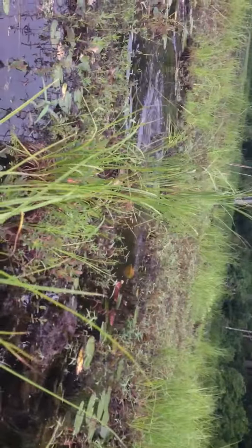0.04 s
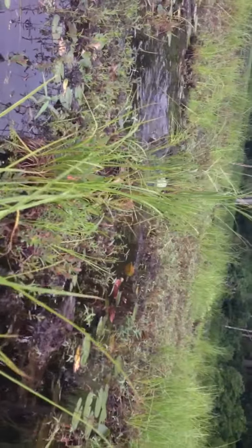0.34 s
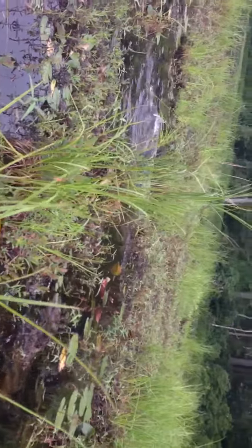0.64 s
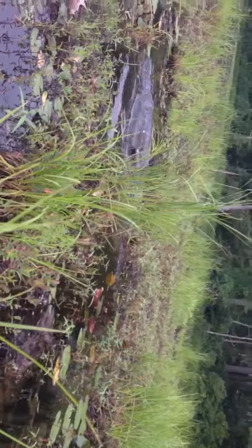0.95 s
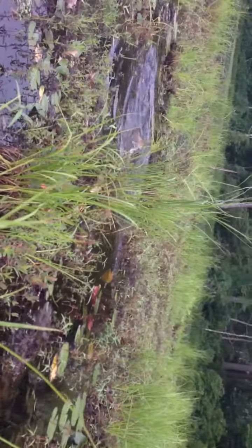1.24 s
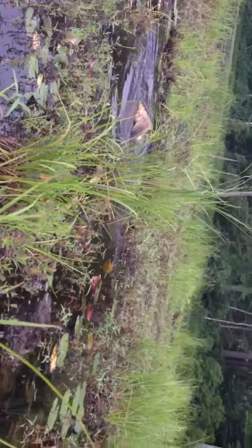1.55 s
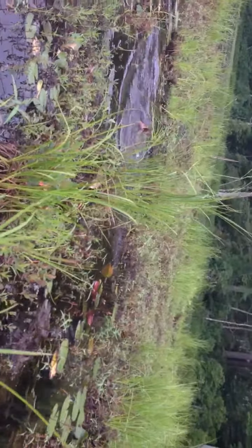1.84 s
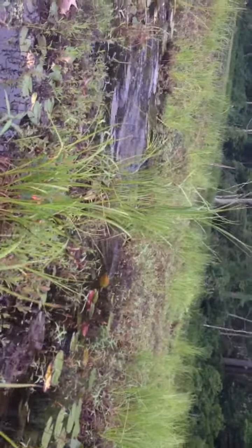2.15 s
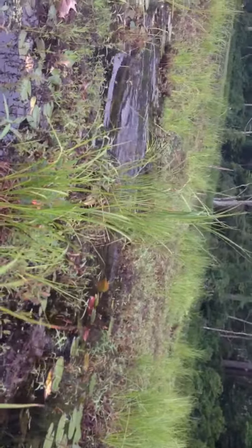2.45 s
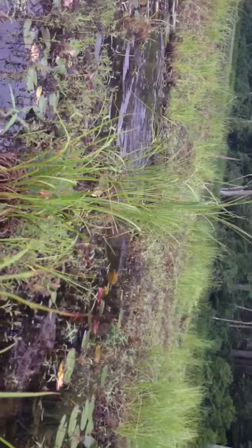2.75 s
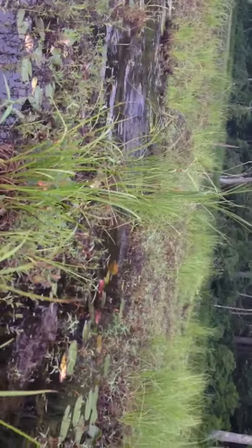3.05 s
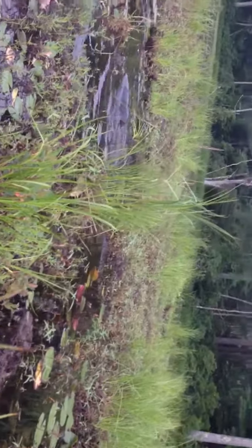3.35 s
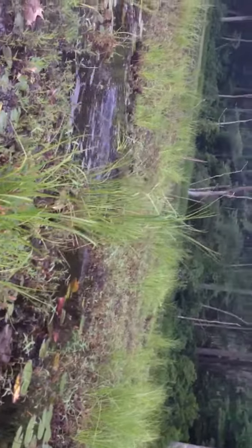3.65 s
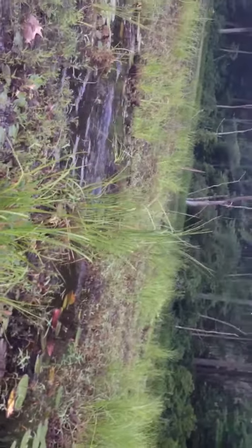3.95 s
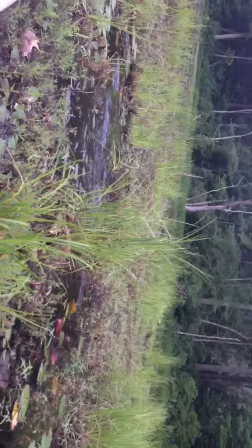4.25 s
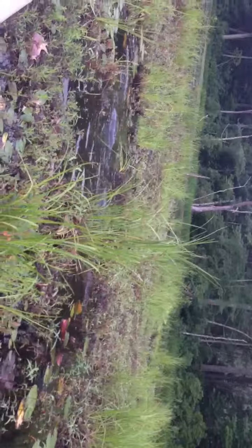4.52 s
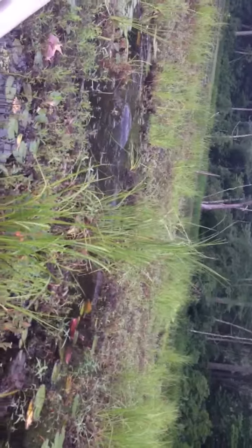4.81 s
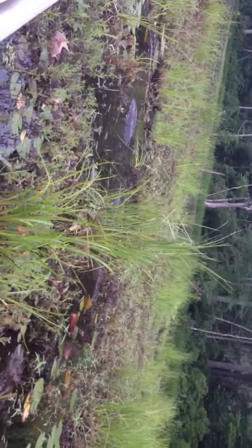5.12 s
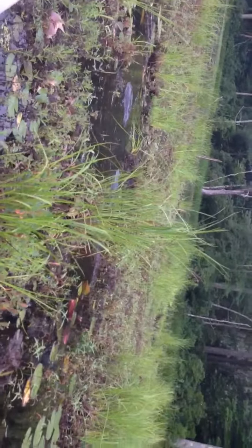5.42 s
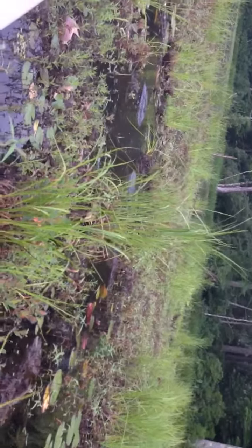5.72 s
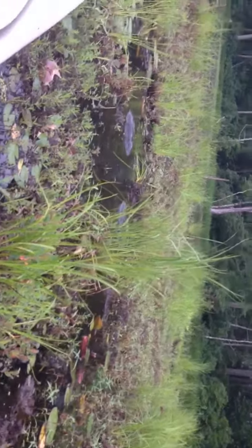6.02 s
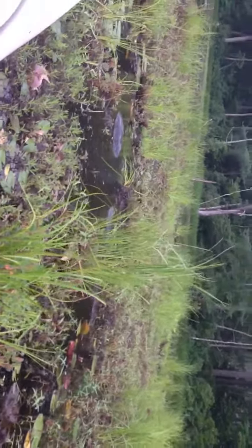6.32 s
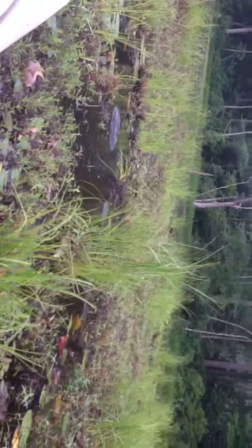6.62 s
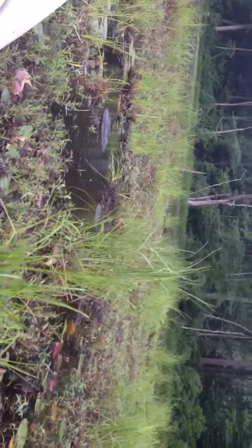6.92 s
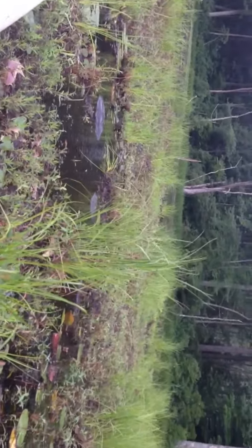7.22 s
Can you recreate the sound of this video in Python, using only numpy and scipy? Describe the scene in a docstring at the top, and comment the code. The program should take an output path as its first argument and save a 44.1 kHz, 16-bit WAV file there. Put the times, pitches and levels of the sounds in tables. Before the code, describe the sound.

Something splashes and gurgles in a pond, then faint birds chirp over quiet hiss, with close bumps and clicks from handling.

```python
"""Turtles thrash at the surface of a pond a few metres away: wet slaps, spray and gulping bubbles
that ring as air pockets close, then a few last plops. Small birds chip and whistle from the trees
over a quiet hiss. Close by, the hand holding the camera bumps, clicks and taps its plastic case:
soft bumps set the hollow humming, sharp clicks ring the shell."""
import sys
import numpy as np
from scipy import signal
from scipy.fft import rfft, irfft, next_fast_len
from scipy.io import wavfile
from scipy.ndimage import map_coordinates

SR = 44100
rng = np.random.default_rng(int(sys.argv[2]) if len(sys.argv) > 2 else 0)


def generate_wav(signal):
    """Clip the signal to [-1, 1] and save it as 16-bit WAV at the path in sys.argv[1]."""
    frames = np.transpose(np.atleast_2d(signal))
    scaled = np.clip(frames, -1, 1) * 32767
    pcm = np.round(scaled).astype(np.int16)
    wavfile.write(sys.argv[1], SR, pcm)


N = 325017

# Tone colour of water spray: freq_hz, level_db
SPRAY_SPECTRUM = [(600, -36), (1500, -22.5), (2600, 2), (4500, 5.5), (7000, -2), (10000, -6.5),
                  (15000, -23)]
# Paddling strokes: start_s, bubbling_db, spray_db, settle_t60_s
PADDLE_STROKES = [(0.14, -47.5, -61, .24), (0.303, -54, -60, 0.76), (0.378, -55.5, -55.5, 1),
                  (0.536, -53.5, -51.5, 0.88), (0.718, -52.5, -58.5, 0.5), (1.028, -57, -63, 0.73),
                  (1.212, -52.5, -52.5, 0.136), (1.345, -55.5, -61, 0.17), (1.59, -63.5, -60, 0.64),
                  (2.35, -62.5, -72, 0.3)]
# Resonances of the hollow case: pitch_hz, level_db, t60_s
HOLLOW_MODES = [(130, -11, 0.12), (198.3, -0.5, 0.1), (293.6, -25, 0.3), (359, -7, 0.079),
                (420, -17.5, 0.17)]


def amp(db):
    """Decibels to gain."""
    return 10 ** (np.asarray(db) / 20)


def unit(x):
    """Scale to rms 1."""
    return x / np.sqrt(np.mean(x ** 2) + 1e-20)


def along(points, hz):
    """Read (freq_hz, value) points on a log frequency axis."""
    freqs, values = np.transpose(points)
    return np.interp(np.log(hz + 1), np.log(freqs), values)


def colour(spectrum, hz, tilt_db):
    """Gain of a spectrum at hz, tilted by tilt_db an octave above 500 Hz."""
    return amp(along(spectrum, hz) + tilt_db * np.log2(np.maximum(hz, 500)))


def wobble(rate):
    """A smooth random curve, rate knots a second."""
    knots = rng.standard_normal(int(N * rate / SR) + 4)
    grid = np.arange(0, N, 32)
    return np.interp(np.arange(N), grid, map_coordinates(knots, [grid * rate / SR]))


def filtered(x, gain):
    """x through a gain that depends on frequency."""
    size = next_fast_len(len(x) + 8192)
    return irfft(rfft(x, size) * gain(np.fft.rfftfreq(size, 1 / SR)), size)[:len(x)]


def noise(spectrum, size=N):
    """Coloured noise of rms 1."""
    return unit(filtered(rng.standard_normal(size), lambda hz: amp(along(spectrum, hz))))


def dying(t, t60):
    """Exponential decay of 60 dB in t60."""
    return np.exp(-np.log(1000) * t / t60)


def ring(modes, t, scatter_db):
    """Damped modes, each at a slightly new strength on every hit."""
    return sum(amp(db + scatter_db * rng.normal()) * dying(t, t60) * np.sin(2 * np.pi * hz * t)
               for hz, db, t60 in modes)


def struck(x, spectrum, tilt_db=0):
    """Colour a hit through a minimum-phase filter of unit energy, which keeps the attack sharp."""
    size = 2048
    cepstrum = irfft(np.log(colour(spectrum, np.fft.rfftfreq(size, 1 / SR), tilt_db)))
    cepstrum[1:size // 2] *= 2
    cepstrum[size // 2:] = 0
    response = irfft(np.exp(rfft(cepstrum)))
    return signal.fftconvolve(x, response / np.linalg.norm(response))[:len(x)]


def add(track, s, sound):
    """Mix a sound into the track at s seconds."""
    part = track[max(0, round(s * SR)):][:len(sound)]
    part += sound[:len(part)]


def outdoors(x, wet_db):
    """x with a diffuse echo from the banks and trees."""
    # Decay of the echo: freq_hz, t60_s
    echo_decay = [(200, 0.194), (1500, 0.28), (8000, 0.31), (15000, 0.106)]
    hz, t, bands = signal.stft(rng.standard_normal(SR // 2), SR, nperseg=256)
    tail = signal.istft(bands * dying(t, along(echo_decay, hz)[:, None]), SR, nperseg=256)[1]
    return x + amp(wet_db) * signal.fftconvolve(x, tail / np.linalg.norm(tail))[:N]


def air(hiss_db=-63, murmur_db=-68.5):
    """Steady hiss and a low murmur of air, which the hollow of the case colours."""
    # Tone colour of the hiss: freq_hz, level_db
    hiss_spectrum = [(15, -67.5), (25, -43), (79, -25), (209, 1.5), (359, -13), (457, -16), (598, -16.5),
                     (741, -22.5), (1570, -26.5), (2770, -22.5), (5430, -24), (7500, -25.5), (8130, -26),
                     (15500, -27.5)]

    def hollow(hz):
        peaks = sum(amp(db) / (1 + ((hz - centre) / 28) ** 2) for centre, db, _ in HOLLOW_MODES)
        return peaks * hz ** 2 / (hz ** 2 + 120 ** 2)

    murmur = unit(filtered(rng.standard_normal(N), hollow))
    return amp(hiss_db) * noise(hiss_spectrum) + amp(murmur_db + 0.95 * wobble(4.7)) * murmur


def swell(s, db, t60, rise_s=0.0096):
    """Power of one stroke's wash: a quick rise, then the water settles."""
    age = np.maximum(np.arange(N) / SR - s, 0)
    return (amp(db) * np.minimum(age / rise_s, 1) * dying(np.maximum(age - rise_s, 0), t60)) ** 2


def agitation(stir_db=-69.5, dive_s=1.74, calm_t60_s=2.1):
    """Gains of bubbling and spray: strokes pile up on water that stays stirred until the turtles dive."""
    stir = amp(stir_db) * dying(np.maximum(np.arange(N) / SR - dive_s, 0), calm_t60_s)
    bubbling = stir ** 2 + sum(swell(s, db, t60) for s, db, _, t60 in PADDLE_STROKES)
    spray = sum(swell(s, db, t60) for s, _, db, t60 in PADDLE_STROKES)
    return np.sqrt(bubbling), np.sqrt(spray)


def grains(count, centre_hz, spread, cycles, rise, uneven_db):
    """A steady swarm of tiny bubbles, each rising in pitch; rms 1."""
    draw = rng.random((count, 2))
    starts = (draw[:, :1] * N).astype(int)
    gain = amp(uneven_db * np.minimum(-np.log(draw[:, 1:]), 3))
    hz = np.clip(centre_hz * np.exp(spread * rng.standard_normal((count, 1))), 400, 14000)
    samples = np.arange(SR // 90)
    age = samples / SR * hz / cycles
    envelope = gain * (1 - np.exp(-6 * age)) * np.exp(-2 * age)
    chirp = np.sin(2 * np.pi * cycles * age * (1 + rise * np.minimum(age, 2) / 2))
    return unit(np.bincount((starts + samples).ravel(), (envelope * chirp).ravel(), N)[:N])


def churn(bubbling_gain, spray_gain):
    """Stirred water bubbles, tinkles with droplets and throws a fine spray."""
    bubbling = grains(count=3000, centre_hz=1400, spread=0.488, cycles=7.4, rise=0.32, uneven_db=0)
    droplets = grains(count=900, centre_hz=3484, spread=0.394, cycles=10.1, rise=0.167, uneven_db=6)
    fizz = grains(count=2400, centre_hz=6100, spread=0.31, cycles=3, rise=0.091, uneven_db=8)
    mist = noise(SPRAY_SPECTRUM) * amp(2.8 * wobble(81))
    spray = amp(-4) * droplets + amp(-3) * fizz + amp(-2.5) * mist
    return amp(-3.5) * bubbling_gain * bubbling + spray_gain * spray


def strays(bubbling_gain, count=80, centre_hz=1195, spread_octaves=0.75, glide_spread=0.119):
    """Lesser bubbles, as strong as the water is stirred: rows of start_s, pitch_hz, gain, glide."""
    last_stroke_s = PADDLE_STROKES[-1][0]
    starts = (np.arange(count) + rng.random(count)) / count * last_stroke_s
    pitch, strength, glide = rng.standard_normal((count, 3)).T
    gain = bubbling_gain[(starts * SR).astype(int)] * amp(6 + 3 * strength)
    return list(zip(starts, centre_hz * 2 ** (spread_octaves * pitch), gain, glide_spread * glide))


def bubbles(bubbling_gain, roughness=0.23, glide_s=0.015, after_ring_db=-20):
    """Air pockets ring and glide as they near the surface; the moving water roughens each note."""
    # Large air pockets closing: start_s, pitch_hz, level_db, glide_octaves_per_10ms
    air_pockets = [(0.052, 1118, -51.5, -0.031), (0.148, 2130, -36, 0.045), (0.165, 1645, -37.5, 0.43),
                   (0.190, 597.6, -44, -0.085), (0.200, 1230, -46.5, 0.45), (0.278, 830, -49, 0.22),
                   (0.320, 1860, -46.5, -0.064), (0.329, 1657, -28.5, -0.12), (0.404, 1376, -35, -0.0067),
                   (0.417, 1100, -34, 0.42), (0.464, 1480, -38, 0.13), (0.514, 713, -47.5, 0),
                   (0.566, 1090, -44.5, -0.15), (0.641, 970, -46.5, -0.21), (0.788, 1240, -37.5, 0.023),
                   (0.837, 1036, -44.5, -0.047), (0.908, 698, -51, 0.03), (0.936, 840, -49, 0.12),
                   (1.023, 1400, -46.5, -0.047), (1.045, 980, -49, 0.051), (1.137, 576, -52, -0.12),
                   (1.178, 1190, -37.5, -0.12), (1.223, 657, -35.5, -.3), (1.341, 1400, -47.5, -0.106),
                   (1.352, 720, -47.5, -0.25), (1.407, 512, -51, 0.014), (1.760, 3210, -47, 0.31),
                   (1.846, 4330, -48.5, 0.051), (1.911, 1015, -55.5, 0.11), (1.687, 1436, -45.5, 0.019),
                   (2.147, 5700, -46, 0.027), (2.325, 484, -46.5, -0.0094), (2.367, 1037, -48.5, -.15),
                   (2.375, 420, -50, -0.054), (2.464, 3330, -43.5, 0.026), (2.700, 1085, -43.5, .3),
                   (2.703, 650, -47.5, -.1), (6.306, 640, -51.5, -0.079), (6.988, 672, -51, -.1),
                   (7.045, 640, -52.5, -.2)]
    out, t = np.zeros(N), np.arange(SR // 10) / SR
    pinch_off = 1 - np.exp(-t / 0.0007)
    turbulence = noise([(150, 0.5), (400, -1), (1500, -31)], size=next_fast_len(N))
    flutter = 1 + roughness * signal.hilbert(turbulence)
    large = [(s, hz, amp(db), glide) for s, hz, db, glide in air_pockets]
    for s, hz, gain, glide in large + strays(bubbling_gain):
        pitch = hz * 2 ** (glide * np.minimum(t, glide_s) / 0.01)
        t60 = 0.034 * (1000 / hz) ** 0.692  # small, high bubbles die sooner
        fade = dying(t, t60) + amp(after_ring_db) * dying(t, t60 * 3.6)
        tone = np.exp(2j * np.pi * np.cumsum(pitch) / SR)
        note = np.imag(flutter[int(s * SR):][:len(t)] * tone)
        add(out, s, gain * note * pinch_off * fade)
    return out


def slaps():
    """Shells and feet smack the surface: a sharp tick, a burst of spray and a lower splash."""
    # Smacks on the water: start_s, level_db, splash_boost_db
    smacks = [(0.171, -33.5, -7), (0.1903, -41.5, -13), (0.3204, -39, 4.5), (0.39, -31, 1),
              (0.4412, -37.5, 10), (0.4493, -30.5, 0), (0.5459, -30.5, -3.5), (0.7304, -41.5, 12.5),
              (0.7869, -37.5, -12), (1.043, -31, -1), (1.0495, -24, -11), (1.0545, -26, -18),
              (1.0615, -33, -13), (1.2236, -35.5, 3.5), (1.391, -40.5, 7.5), (1.658, -38, -11),
              (2.3242, -58, 18.5), (2.370, -56, 17.5)]
    splash_spectrum = [(100, -49), (450, -2), (1800, -1), (4000, -46), (12000, -52)]
    out, t = np.zeros(N), np.arange(SR // 12) / SR
    spray_fade = amp(-11.5) * dying(t, 0.0059) + amp(-22) * dying(t, 0.048)
    for s, db, splash_db in smacks:
        spatter, slosh = rng.standard_normal((2, len(t)))
        tilt_db = -0.5 - 0.52 * splash_db  # less splash, brighter smack
        burst = struck((t == 0) + spatter * spray_fade, SPRAY_SPECTRUM, tilt_db)
        splash = struck(slosh * dying(t, 0.06), splash_spectrum)
        add(out, s, amp(db) * (burst + amp(splash_db - 21) * splash))
    return out


def drips(count=36, first_s=0.37, last_s=2.55, centre_hz=4840, spread_octaves=0.46, t60_s=0.015):
    """Thrown drops fall back on the pond with tiny high plinks."""
    out, t = np.zeros(N), np.arange(SR // 30) / SR
    starts = np.interp((np.arange(count) + rng.random(count)) / count, [0, 1], [first_s, last_s])
    for s, (pitch, strength) in zip(starts, rng.standard_normal((count, 2))):
        hz = centre_hz * 2 ** (spread_octaves * pitch)
        add(out, s, amp(-57 + 3 * strength) * dying(t, t60_s) * np.sin(2 * np.pi * hz * t))
    return out


def far_calls(trim_db=-2.5):
    """Distant bird calls, smeared by the trees into a wavering blur."""
    # Bands of birdsong: start_s, length_s, centre_hz, level_db, half_width_octaves
    calls = [(1.716, .32, 2800, -70, 0.14), (5.078, .28, 1700, -71, 0.35), (5.699, 0.59, 2680, -73, 0.52),
             (6.454, 0.647, 2400, -71, 0.54), (6.917, 0.61, 2266, -73.5, .3)]
    out = np.zeros(N)
    waver = amp(3 * wobble(30))
    for s, length, hz, db, width in calls:
        size = int(length * SR)
        blur = noise([(hz * 2 ** (width * k), -6 * k * k) for k in range(-3, 4)], size)
        envelope = np.hanning(size) * np.roll(waver, -int(s * SR))[:size]
        add(out, s, amp(db + trim_db) * envelope * blur)
    return out


def bumps(rebound_s=0.0203, rebound_db=-15.5, port_hz=108):
    """The hand pushes the case and settles: a dull thud each time, then its hollow hums and shudders."""
    # Soft pushes on the case: start_s, level_db, contact_s, hum_db
    pushes = [(1.9861, -21, 0.00605, -7.5), (2.9050, -37, 0.0066, 3), (3.6849, -31.5, 0.0083, 3.5),
              (4.4328, -33, 0.0065, 6), (5.815, -54.5, 0.00913, 8.5), (6.229, -43, 0.005, -6.5)]
    shudder_spectrum = [(50, -25), (130, 11), (450, 7.5), (700, -33), (2000, -45)]
    out, t = np.zeros(N), np.arange(SR // 5) / SR
    rebounds = [(s + rebound_s, db + rebound_db, contact * 1.36, hum_db)
                for s, db, contact, hum_db in pushes]
    for s, db, contact, hum_db in pushes + rebounds:
        progress = np.minimum(t / contact, 1)
        thud = np.sin(np.pi * progress) * np.sin(4 * np.pi * progress)  # the wall flexes in and out twice
        shudder = amp(-12) * dying(t, 0.18) * noise(shudder_spectrum, len(t))
        hum = (ring(HOLLOW_MODES, t, scatter_db=1) + shudder) * (1 - np.exp(-t / 0.003))
        add(out, s, amp(db) * (amp(-3) * thud + amp(hum_db) * hum))
    # the small microphone port passes no deep bass
    return signal.sosfilt(signal.butter(2, port_hz, "high", fs=SR, output="sos"), out)


def bird_note(pitch):
    """A pure note on a pitch curve, swelling and fading."""
    envelope = np.sqrt(np.abs(np.sin(np.linspace(0, np.pi, len(pitch)))))
    return envelope * np.sin(2 * np.pi * np.cumsum(pitch) / SR)


def chips(length_s=0.054, scoop_depth=0.13, rise_s=0.0152, trim_db=-2.5):
    """A small bird's high chips, each scooping up toward its top pitch."""
    # Chip notes: start_s, top_hz, level_db
    notes = [(2.624, 8440, -56), (2.736, 8050, -58.5), (2.87, 8150, -59.5), (3.517, 7900, -61),
             (4.625, 7590, -65.5)]
    out, t = np.zeros(N), np.arange(int(length_s * SR)) / SR
    scoop = 1 - scoop_depth * np.exp(-t / rise_s)
    for s, top_hz, db in notes:
        add(out, s, amp(db + trim_db) * bird_note(top_hz * scoop))
    return out


def whistles(slur_power=1.42, trim_db=-0.5):
    """A songbird's slurred whistles hold their pitch, then bend away, mostly downward."""
    # Whistled notes: start_s, length_s, pitch_hz, fall_octaves, level_db
    notes = [(3.332, 0.0646, 2140, 0.21, -73), (4.507, .045, 2940, 0.26, -63.5),
             (4.797, 0.041, 2954, 0.112, -65), (4.83, 0.0564, 2806, 0.055, -65.5),
             (4.894, .062, 2810, 0.356, -69), (5.174, .17, 3960, -.08, -75),
             (5.37, 0.201, 2386, 0.044, -68.5), (5.42, .06, 3230, .06, -72), (5.547, 0.037, 2983, .08, -65),
             (5.629, .085, 2646, 0.055, -68)]
    out = np.zeros(N)
    for s, length, hz, fall, db in notes:
        slur = np.linspace(0, 1, int(length * SR)) ** slur_power
        add(out, s, amp(db + trim_db) * bird_note(hz * 2 ** (-fall * slur)))
    return out


def clicks():
    """The plastic case snaps: a spike, a brief rattle with a weak tail, and the ring of its shell."""
    # Sharp snaps: start_s, level_db, tilt_db_per_octave, ring_db
    snaps = [(4.4186, -12, -2.5, -3), (4.4212, -26, 9, -7), (4.433, -30, -4.5, -17),
             (4.5907, -36.5, -3.5, -27)]
    # Tone colour of the crack: freq_hz, level_db
    crack_spectrum = [(100, -57), (400, -22.5), (850, -22.5), (1400, -10), (4600, 2), (5800, -0.5),
                      (8000, -0.5), (10500, 0), (12000, -1), (15000, -8.5)]
    # Resonances of the plastic shell: pitch_hz, level_db, t60_s
    shell_modes = [(1530, -10, 0.0074), (2210, -14, 0.028), (2264, -11.5, 0.038), (3230, -19, 0.015),
                   (3330, -10, 0.023), (4053, -10, 0.031), (4350, -11, 0.06), (4440, -5.5, 0.036),
                   (5016, -25.5, 0.034), (6330, -30, 0.05)]
    out, t = np.zeros(N), np.arange(SR // 5) / SR
    low_cut = signal.butter(4, 1300, "high", fs=SR, output="sos")
    attack = 1 - np.exp(-t / 0.000335)
    for s, db, tilt_db, ring_db in snaps:
        rattle = rng.standard_normal(len(t)) * (amp(-6) * dying(t, 0.014) + amp(-29.5) * dying(t, 0.14))
        crack = struck((t == 0) + rattle, crack_spectrum, tilt_db)
        shell = signal.sosfilt(low_cut, ring(shell_modes, t, scatter_db=-1.5))
        add(out, s, amp(db) * (crack + amp(ring_db) * shell * attack))
    return out


def taps():
    """A fingertip taps the case: a dry knock with no ring."""
    # Fingertip knocks: start_s, level_db, tilt_db_per_octave
    knocks = [(6.2292, -16.5, -0.5), (6.2468, -34, 5.5)]
    # Tone colour of a knock: freq_hz, level_db
    knock_spectrum = [(120, -35.5), (400, -0.5), (850, -6), (1400, -0.5), (1900, -22), (2450, -6),
                      (3500, -15), (4900, -6), (5500, -19), (8000, -16), (10000, -29), (15000, -38)]
    out, t = np.zeros(N), np.arange(SR // 20) / SR
    for s, db, tilt_db in knocks:
        rattle = amp(-21) * rng.standard_normal(len(t)) * dying(t, 0.02)
        add(out, s, amp(db) * struck((t == 0) + rattle, knock_spectrum, tilt_db))
    return out


def scene():
    """Pond and birds with their echo, a bed of air, and the knocks of the case dry and close."""
    bubbling_gain, spray_gain = agitation()
    splashing = churn(bubbling_gain, spray_gain) + bubbles(bubbling_gain) + slaps() + drips()
    water = outdoors(splashing, wet_db=-15)
    birds = outdoors(far_calls() + chips() + whistles(), wet_db=-5)
    return (water + birds + air() + bumps() + clicks() + taps())[None]


def record(dry):
    """The camera's band limit cuts off the highest treble."""
    top_hz, fade_hz = 15500, 400
    return filtered(dry[0], lambda hz: np.clip((top_hz - hz) / fade_hz + 0.5, 0, 1))[None]


dry = scene()
out = record(dry)
generate_wav(out)
```